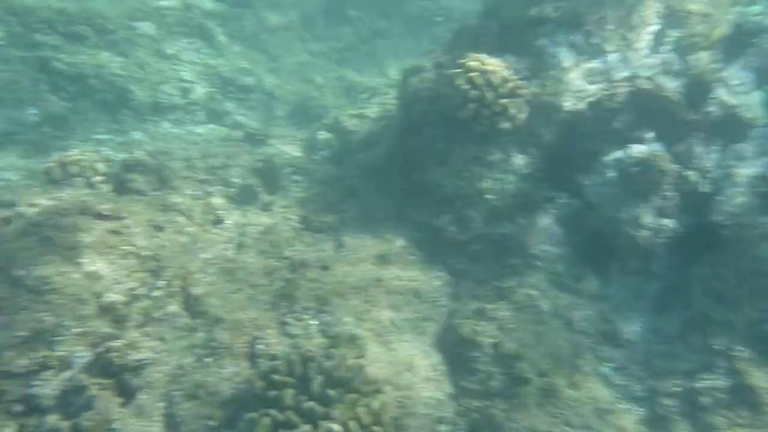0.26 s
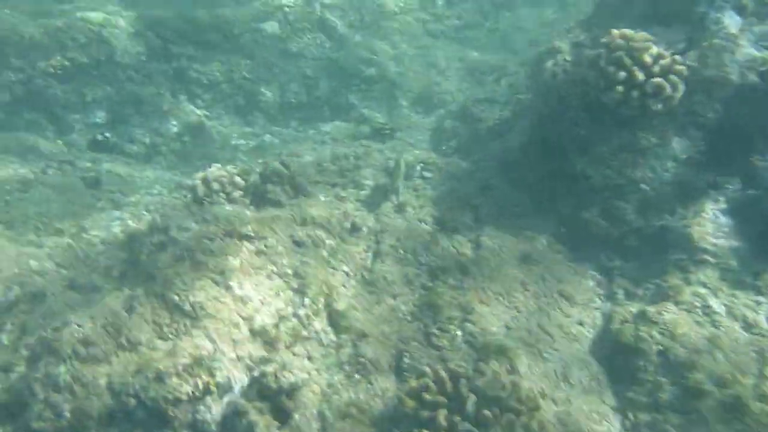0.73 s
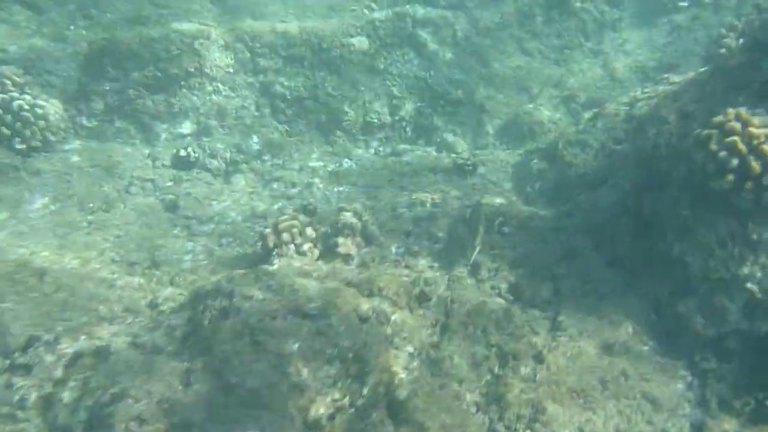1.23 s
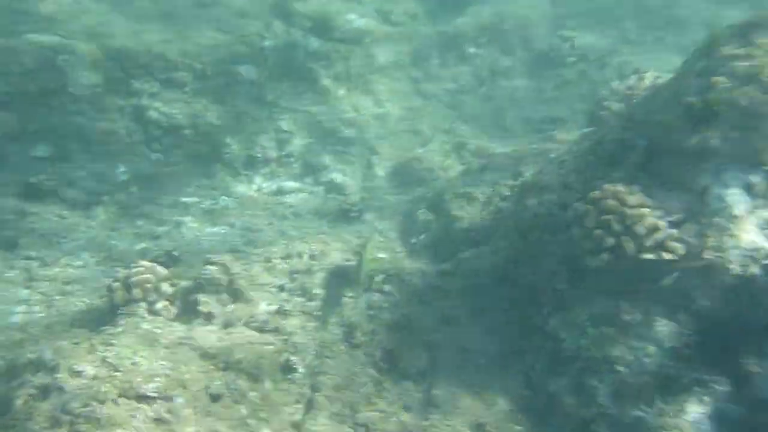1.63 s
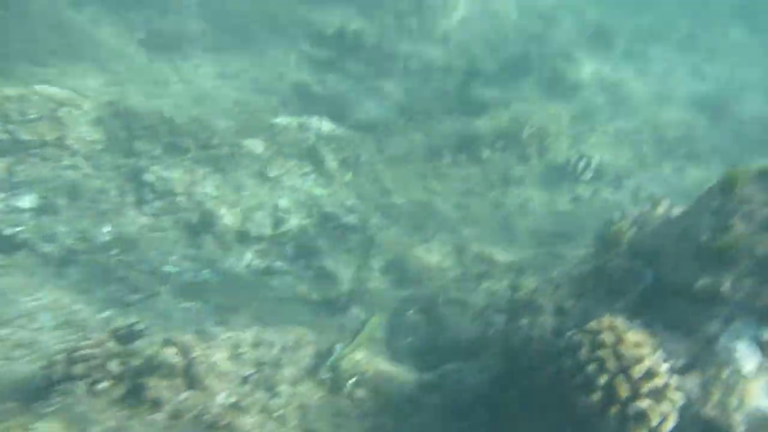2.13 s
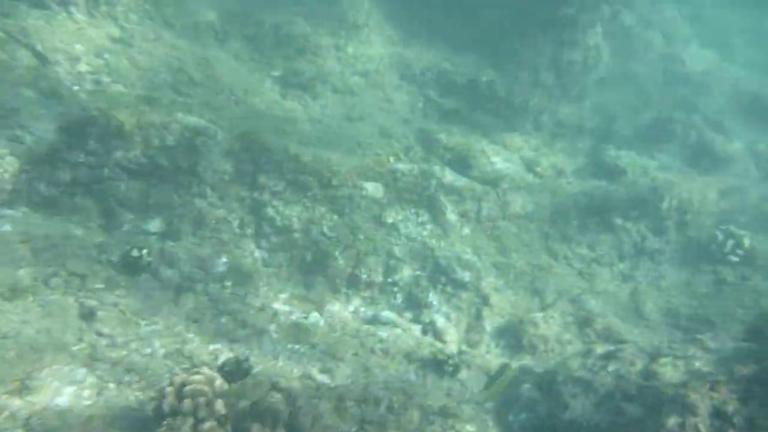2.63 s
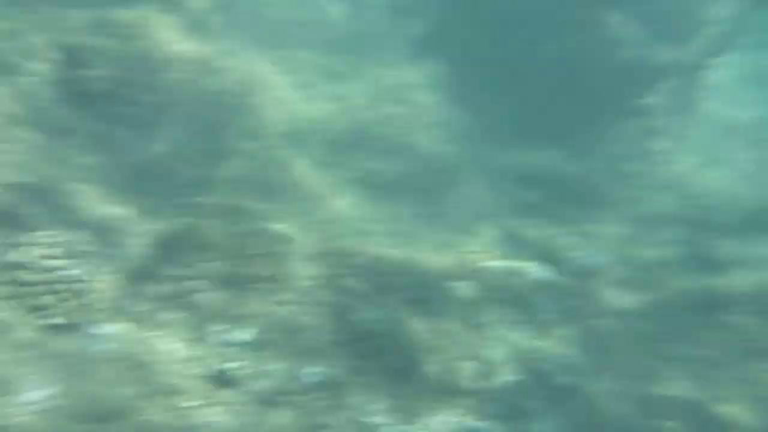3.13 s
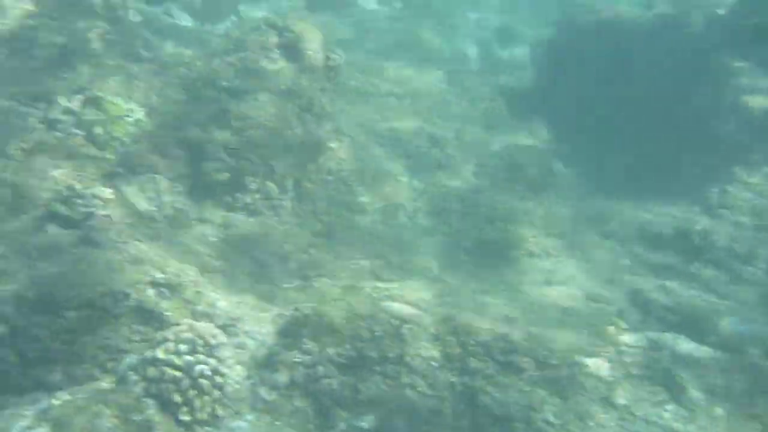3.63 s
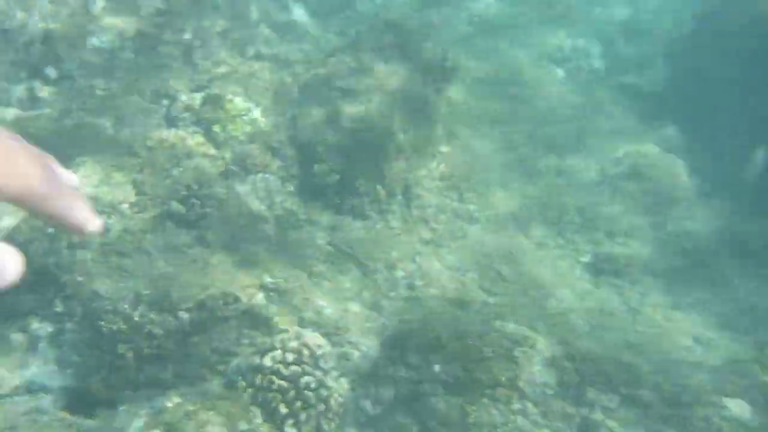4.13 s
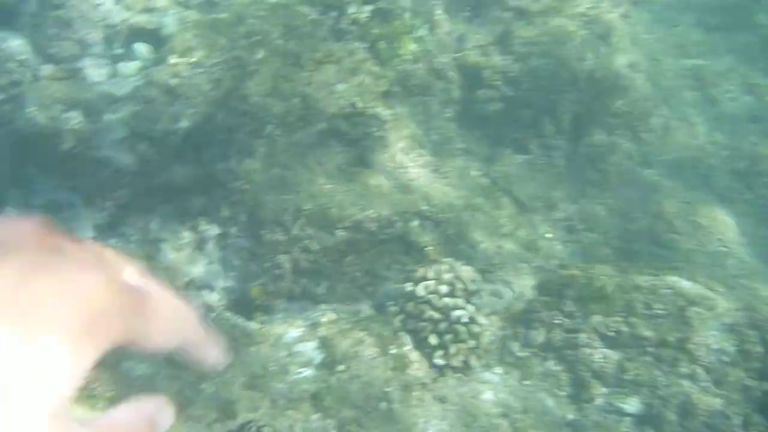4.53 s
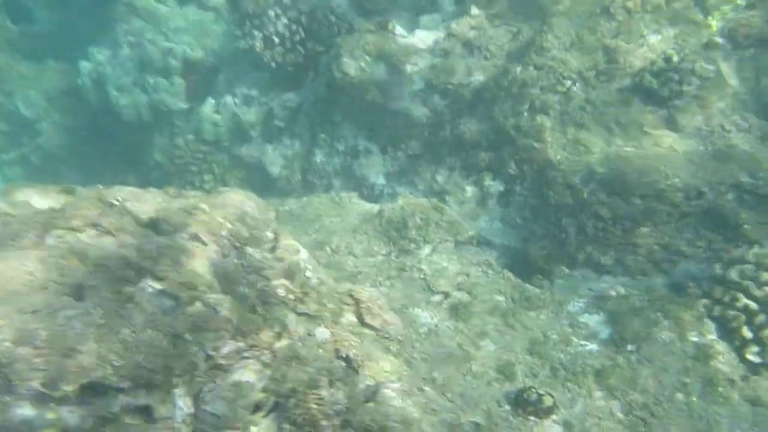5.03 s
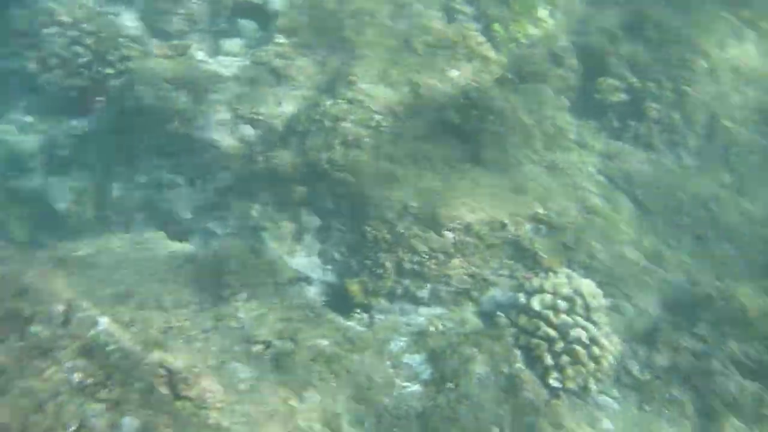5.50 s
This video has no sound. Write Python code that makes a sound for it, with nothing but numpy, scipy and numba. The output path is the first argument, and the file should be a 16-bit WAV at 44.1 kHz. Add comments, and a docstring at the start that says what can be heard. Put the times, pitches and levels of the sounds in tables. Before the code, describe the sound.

Hollow, muffled water murmur with constant tiny crackles and irregular hard snaps; later rough scuffs and a flurry of gliding bubble plinks.

```python
"""A muffled, ringing murmur and a bubble's plink come first, then sharp snaps over a shallow coral reef.
Snapping shrimp send single pulses that crack and ring a waterproof camera housing; random clicks through
resonances make the far reef, and many tiny cracks make the sizzle. Bubbles are gliding, dying tones, low
knocks are shorter or deeper ones, and scuffs are bursts of small slips. The recorder narrows the band,
turns down after loud snaps and rounds off their peaks."""
import sys
import numpy as np
from scipy import signal
from scipy.fft import rfft, irfft
from scipy.io import wavfile
from scipy.ndimage import uniform_filter1d, minimum_filter1d, map_coordinates
from numba import njit

SR = 44100
rng = np.random.default_rng(int(sys.argv[2]) if len(sys.argv) > 2 else 0)


def to_wav(sig):
    """Store sig (one row per channel, or 1-D mono) as 16-bit WAV at the path in sys.argv[1].

    Samples outside -1..1 are clipped; the rate is SR.
    """
    pcm = np.clip(np.atleast_2d(sig), -1, 1) * 32767
    pcm = np.round(pcm).astype(np.int16)
    wavfile.write(sys.argv[1], SR, pcm.T)  # frames by channels


N = 253995  # length in samples


def undb(db):
    """Decibels to gain."""
    return 10 ** (np.asarray(db) / 20)


def level(x):
    """Scale to an rms (average strength) of 1."""
    return x / np.sqrt(np.mean(x ** 2))


def unit_peak(x):
    """Scale so that the envelope peaks at 1."""
    return x / np.abs(signal.hilbert(x)).max()


def add(out, s, x):
    """Mix x into out from time s on, in seconds."""
    i = int(np.clip(s * SR, 0, N - 1))
    out[i:i + len(x)] += x[:N - i]


def at(curve, s):
    """Value of a (seconds, value) curve at the times s."""
    return np.interp(s, *np.transpose(curve))


def fade(t, t60):
    """Exponential decay, 60 dB down after t60 seconds."""
    return np.exp(-np.log(1000) * t / t60)


def lowpass(x, hz):
    """Fourth-order low-pass: keeps what lies below hz."""
    return signal.sosfilt(signal.butter(4, hz, fs=SR, output="sos"), x)


def highpass(x, hz):
    """Fourth-order high-pass: keeps what lies above hz."""
    return signal.sosfilt(signal.butter(4, hz, "high", fs=SR, output="sos"), x)


def resonate(x, hz, width_hz):
    """A resonance with steep skirts: two equal band-passes in a row, each of the given width."""
    b, a = signal.iirpeak(hz, hz / width_hz, fs=SR)
    once = signal.lfilter(b, a, x)
    return signal.lfilter(b, a, once)


def colour(x, points, size=1024):
    """Filter with the given (Hz, dB) curve that never sounds before its input."""
    hz, db = np.transpose(points)
    grid = np.maximum(np.fft.rfftfreq(size, 1 / SR), 1)
    curve_db = np.interp(np.log(grid), np.log(hz), db)
    # folding the cepstrum forward in time gives the minimum-phase response
    cepstrum = irfft(np.log(undb(curve_db)))
    cepstrum[1:size // 2] *= 2
    cepstrum[size // 2 + 1:] = 0
    response = irfft(np.exp(rfft(cepstrum)))
    return signal.fftconvolve(x, response)[:len(x)]


def walk(rate):
    """Slow chance: random levels held 1 / rate seconds and smoothed twice, spread 1."""
    k = int(SR / rate)
    steps = np.repeat(rng.standard_normal(N // k + 1), k)
    smooth = uniform_filter1d(uniform_filter1d(steps, k), k)
    return level(smooth[:N])


def wander(x, share, rate):
    """Let the pitch of a steady sound stray by a share, rate times a second."""
    read_position = np.cumsum(1 + share * walk(rate))
    return map_coordinates(x, [read_position], mode="mirror")


def clicks(rate, spread_db, limit_db):
    """Impulses at random moments, rate a second; most are far and weak, a few near and strong."""
    chance, size, sign = rng.random(N), rng.exponential(size=N), rng.choice([-1, 1], N)
    size_db = limit_db * np.tanh(spread_db * size / limit_db)
    return (chance < rate / SR) * sign * undb(size_db)


# How strongly each resonance of the housing sounds over time, before the gains below.
# Low rumble of water against the housing. Each row: time in seconds, level in dB.
LOW_LEVEL = [(0.0, -43.5), (0.46, -55.5), (0.7, -50.5), (0.89, -48.5), (1.2, -54), (1.6, -46),
             (2.13, -50.5), (3.3, -49), (4.32, -55), (4.43, -43), (4.6, -43.5), (4.95, -54.5), (5.12, -48),
             (5.35, -48), (5.52, -42.5), (5.65, -52.5), (5.75, -53)]
# Far reef in the hollow resonance. Each row: time in seconds, level in dB.
HOLLOW_LEVEL = [(0.0, -43.5), (0.26, -48.5), (0.72, -47.5), (1.25, -49.5), (1.47, -37), (1.68, -48),
                (2.8, -49), (2.98, -51.5), (3.28, -50), (3.75, -52), (4.32, -47.5), (4.44, -44.5),
                (4.58, -43), (5.04, -55), (5.24, -42.5), (5.46, -39.5), (5.64, -48), (5.75, -46.5)]
# Far reef in the main resonance. Each row: time in seconds, level in dB.
MAIN_LEVEL = [(0.0, -27.5), (0.46, -34.5), (0.74, -28.5), (0.95, -30.5), (1.14, -34.5), (1.49, -25),
              (1.75, -33), (2.15, -30.5), (2.67, -37), (2.99, -40.5), (3.22, -42.5), (3.41, -33),
              (3.86, -44.5), (4.18, -38.5), (4.32, -36), (4.36, -28.5), (4.43, -31.5), (4.66, -32),
              (4.79, -42), (5.41, -30.5), (5.75, -38.5)]
# Far reef in the upper resonance. Each row: time in seconds, level in dB.
UPPER_LEVEL = [(0.0, -38), (0.42, -48), (2.37, -39), (2.58, -36), (2.9, -34), (3.46, -39), (4.07, -31.5),
               (4.37, -50), (4.66, -44), (4.96, -39.5), (5.11, -47.5), (5.75, -55.5)]
LOW_DB, HOLLOW_DB, MAIN_DB, UPPER_DB = 1, 2, 0, -7.5  # gain of each resonance over its curve, in dB


def ringing(s):
    """Levels in dB of the low, hollow, main and upper resonances of the housing at the times s."""
    return (at(LOW_LEVEL, s) + LOW_DB, at(HOLLOW_LEVEL, s) + HOLLOW_DB,
            at(MAIN_LEVEL, s) + MAIN_DB, at(UPPER_LEVEL, s) + UPPER_DB)


# The four resonances, low to high, each made of a few peaks.
# Each row: pitch in Hz, width in Hz, strength in dB against the other peaks of its resonance.
LOW_PEAKS = [(145, 1300, -17), (265.3, 97, 0.5), (406, 69.5, 8), (602, 140, -7.5)]
HOLLOW_PEAKS = [(909, 145, 9), (1240, 360, -5.5)]
MAIN_PEAKS = [(1406, 130, 1), (1583, 260, 6), (1833, 90, 5.5)]
UPPER_PEAKS = [(2270, 150, 6), (2430, 1100, -10.5)]


def far_reef(drift=.018, swell_db=0.5):
    """Far snaps and water movement keep the resonances ringing; their pitch wanders and they swell unevenly."""
    low_db, hollow_db, main_db, upper_db = ringing(np.arange(N) / SR)
    crowd = clicks(rate=480, spread_db=4.5, limit_db=17) * undb(1.5 * walk(14))
    slosh = clicks(rate=600, spread_db=3.5, limit_db=15) * undb(2.5 * walk(16))

    def ring(drive, peaks):
        """Sum of the peaks, with every other one turned upside down."""
        x = 0
        for k, (hz, width_hz, db) in enumerate(peaks):
            x = x + (-1) ** k * undb(db) * resonate(drive, hz, width_hz)
        return level(wander(x, drift, 25))

    low = ring(slosh, LOW_PEAKS) * undb(low_db)
    hollow = ring(crowd, HOLLOW_PEAKS) * undb(hollow_db)
    main = ring(crowd, MAIN_PEAKS) * undb(main_db + swell_db * walk(30))
    upper = ring(crowd, UPPER_PEAKS) * undb(upper_db)
    return low + hollow + main + upper


# Colour of a crack heard through the housing, also used by the single snaps.
# Each row: pitch in Hz, strength in dB against the other pitches.
CRACK_COLOUR = [(100, -26), (700, -43), (1500, -12), (2600, 7), (3150, 0.5), (3900, 5.5), (4800, -0.5),
                (6200, -5.5), (7500, -22.5)]
# Resonances that colour the middle-distance cracks.
# Each row: pitch in Hz, width in Hz, strength in dB against the other resonances.
TICK_PEAKS = [(1640, 510, 2), (2600, 700, -3.5), (3520, 500, -.5), (4300, 1400, -1), (5800, 2400, -6)]


def sizzle(ticks_db=-57.0, faint_db=-61.5, hiss_db=-69):
    """Shrimp at middle distance: flurries of tiny cracks, each with its own colour, over a mass of faint ones."""
    flurries = undb(2.5 * np.tanh(walk(5)) + 3 * np.tanh(walk(22)))
    pulses = clicks(rate=340, spread_db=6.5, limit_db=24) * flurries
    ticks = 0
    for hz, width_hz, db in TICK_PEAKS:
        # each crack's own path strengthens or weakens this resonance
        path = undb(6.5 * np.tanh(rng.standard_normal(N)))
        ticks = ticks + undb(db) * level(resonate(pulses * path, hz, width_hz))
    t = np.arange(SR // 80) / SR
    scatter = .13 * rng.standard_normal(len(t)) * fade(t, t60=.0075)
    ticks = ticks + signal.fftconvolve(ticks, scatter)[:N]  # reflections off the coral follow each crack
    ticks = level(wander(ticks, .1, 60))
    faint = level(colour(clicks(rate=1500, spread_db=4, limit_db=15), CRACK_COLOUR))
    hiss = level(colour(rng.standard_normal(N), CRACK_COLOUR))
    return undb(ticks_db) * ticks + undb(faint_db) * faint + undb(hiss_db) * hiss


def plinks(table, rise_s, glide, splash_db, flutter_db=0):
    """Tones that swell, glide and die away, roughened by a splash; rows are seconds, dB, Hz, t60 in seconds."""
    out, t = np.zeros(N), np.arange(SR // 8) / SR
    each = np.ones(len(table))  # glide and splash may be one number or one per row
    rows = np.column_stack([table, glide * each, splash_db * each])
    flutter = undb(flutter_db * np.tanh(walk(650)))
    noises = rng.standard_normal((len(rows), len(t)))
    for (s, db, hz, t60, bend, noise_db), noise in zip(rows, noises):
        swell = 1 - np.exp(-(t / min(rise_s, t60 / 2)) ** 2)
        envelope = swell * fade(t, t60)
        envelope /= envelope.max()
        # the glide takes one t60 and passes the given pitch a fifth of the way through
        pitch_hz = hz * (1 + bend * (np.minimum(t / t60, 1) - .2))
        tone = np.sin(2 * np.pi * np.cumsum(pitch_hz) / SR)
        splash = level(resonate(noise, hz, hz / 2))
        add(out, s, undb(db) * envelope * (tone + undb(noise_db) * splash))
    return out * flutter


def fizz(fizz_db=0):
    """Tiny bubbles at random pitches, each as strong as the housing lets the reef ring at that pitch."""
    when, pitch, cycles, size, bend = rng.random((520, 5)).T
    s, hz = when * N / SR, 900 + 1600 * pitch
    _, *curves = ringing(s)
    centres_hz = [peaks[0][0] for peaks in (HOLLOW_PEAKS, MAIN_PEAKS, UPPER_PEAKS)]
    levels_db = np.transpose(curves)
    housing_db = np.array([np.interp(f, centres_hz, row) for f, row in zip(hz, levels_db)])
    nearness_db = np.minimum(-4.5 * np.log(1 - size), 10)
    t60 = (16 + 28 * cycles) / hz
    table = np.column_stack([s, housing_db + nearness_db + fizz_db, hz, t60])
    return plinks(table, rise_s=.001, glide=.25 * bend - .1, splash_db=-18)


# Burbles: how many a second, lowest and highest pitch in Hz, cycles until 60 dB down.
BURBLES_PER_S, BURBLE_HZ, BURBLE_CYCLES = 45, (960, 1340), 16
# Level of the weakest burble over the hollow curve, and how much stronger the strongest is, in dB.
BURBLE_DB, BURBLE_SPREAD_DB = -0.5, 16


def burble():
    """Bubble tones that drift up or down, stronger while the hollow resonance of the housing rings loud."""
    when, pitch, size, bend = rng.random((int(BURBLES_PER_S * N / SR), 4)).T
    s = when * N / SR
    hz = BURBLE_HZ[0] + (BURBLE_HZ[1] - BURBLE_HZ[0]) * pitch
    db = at(HOLLOW_LEVEL, s) + BURBLE_DB + BURBLE_SPREAD_DB * size ** 2
    table = np.column_stack([s, db, hz, BURBLE_CYCLES / hz])
    return plinks(table, rise_s=.002, glide=.15 * (2 * bend - 1), splash_db=-20)


# Rough scuffs, probably water and fingers on the housing.
# Each row: start in seconds, peak in dB, length in seconds (until the fade is 20 dB down).
SCUFFS = [(3.144, -25, 0.04), (3.32, -31, 0.032), (4.168, -22.5, 0.0086), (4.1887, -13.5, 0.044),
          (4.422, -20.5, 0.062), (4.692, -24, 0.015), (4.756, -26, 0.019), (4.772, -17, 0.068),
          (4.805, -11, 0.028), (4.941, -17.5, 0.012), (4.982, -34, 0.016), (5.075, -20.5, 0.046),
          (5.11, -20, 0.069), (5.48, -21, 0.025), (5.51, -22, 0.042)]
# Colour of a scuff. Each row: pitch in Hz, strength in dB against the other pitches.
SCUFF_COLOUR = [(60, -9.5), (150, -6.5), (400, 6), (680, -5), (900, 8.5), (1500, 16.5), (2300, 3.5),
                (3200, -12.5), (7000, -44.5)]


def scuffs():
    """Short runs of uneven slips that start fast and die away."""
    out = np.zeros(N)
    slips = colour(clicks(rate=1000, spread_db=3.5, limit_db=12), SCUFF_COLOUR)
    for s, db, length in SCUFFS:
        t = np.arange(int(2 * length * SR)) / SR
        envelope = (1 - np.exp(-t / 0.00017)) * fade(t, 3 * length)
        burst = slips[int(s * SR):][:len(t)] * envelope
        add(out, s, undb(db) * unit_peak(burst))
    return out


# Bubbles from each scuff: lowest and highest pitch in Hz, cycles until 60 dB down.
SPRAY_HZ, SPRAY_CYCLES = (1145, 2820), 36
# Their strongest level over the scuff, and the scatter of weakening below that, in dB.
SPRAY_DB, SPRAY_SPREAD_DB = -6.5, 16.5


def spray(count=9):
    """A cloud of short, rough bubbles breaks from each scuff and weakens as the scuff dies."""
    start, scuff_db, length = np.repeat(SCUFFS, count, axis=0).T
    when, pitch, size = rng.random((len(start), 3)).T
    hz = SPRAY_HZ[0] * (SPRAY_HZ[1] / SPRAY_HZ[0]) ** pitch
    db = scuff_db + SPRAY_DB - SPRAY_SPREAD_DB * (size + when + pitch) / 2  # late, high ones are weaker
    table = np.column_stack([start + when * length, db, hz, SPRAY_CYCLES / hz])
    return plinks(table, rise_s=.0006, glide=.1, splash_db=-12)


# Gulps: how many a second, lowest and highest pitch in Hz, cycles until 60 dB down.
GULPS_PER_S, GULP_HZ, GULP_CYCLES = 13, (195, 425), 4.9
# Level of the weakest gulp over the low rumble curve, and how much stronger the strongest is, in dB.
GULP_DB, GULP_SPREAD_DB = -5, 5


def gurgle():
    """Rows of small gulps at random moments, stronger while water rumbles against the housing."""
    when, pitch, size = rng.random((int(GULPS_PER_S * N / SR), 3)).T
    s = when * N / SR
    hz = GULP_HZ[0] + (GULP_HZ[1] - GULP_HZ[0]) * pitch
    db = at(LOW_LEVEL, s) + GULP_DB + GULP_SPREAD_DB * size ** 2
    return np.column_stack([s, db, hz, GULP_CYCLES / hz])


# Low knocks and gulps, perhaps fish or water slapping the housing.
# Each row: start in seconds, level in dB before filtering, pitch in Hz, seconds until 60 dB down.
KNOCKS = [(0.3571, -34, 414, 0.089), (0.7948, -28.5, 268, 0.063), (0.8425, -33.5, 306, 0.077),
          (0.89, -36.5, 337, 0.15), (0.9472, -32.5, 356, 0.13), (1.3745, -28.5, 375, 0.086),
          (1.832, -21, 523, 0.0048), (1.8362, -10, 480, 0.0059), (1.9008, -11, 510, 0.0065),
          (2.7645, -19, 402, 0.043), (2.982, -36, 419, 0.098), (3.1495, -35.5, 202, 0.034),
          (3.288, -26, 423, 0.08), (4.1875, -25.5, 410, 0.011), (4.2458, -30, 434, 0.013),
          (4.9382, -29.5, 440, 0.0089), (5.113, -34, 370, 0.0096), (5.154, -31, 448, 0.02),
          (5.203, -34, 426, 0.024), (5.243, -34.5, 435, 0.056), (5.3439, -24.5, 424, 0.08),
          (5.4775, -23.5, 345, 0.0055), (5.5049, -29.5, 244, 0.007), (5.542, -34.5, 362, 0.15),
          (5.651, -33.5, 384, 0.04), (5.665, -23, 372, 0.0037), (5.7024, -14, 500, 0.0037)]


def knocks(ring_hz=412, ring_width_hz=90, ring_db=-6):
    """Soft low pushes on the housing; a low resonance of it rings on briefly after each."""
    table = np.vstack([KNOCKS, gurgle()])
    pushes = lowpass(plinks(table, rise_s=0.0032, glide=0.15, splash_db=-14.5), 600)
    return pushes + undb(ring_db) * resonate(pushes, ring_hz, ring_width_hz)


# Single bubbles, large and small, loud and faint.
# Each row: start in seconds, level in dB before the flutter, pitch in Hz,
# seconds until 60 dB down, glide as a share of the pitch, splash in dB against the tone.
BUBBLES = [(0.0166, -18, 1612, 0.067, -0.029, -10), (0.4507, -13, 1576, 0.02, -0.093, -42),
           (0.832, -32, 1640, 0.0099, 0.0047, -8), (1.1766, -16.5, 1416, 0.045, .04, -19),
           (1.407, -16.5, 1690, 0.016, 0.022, -15), (1.878, -20.5, 1640, 0.054, 0.034, -18),
           (2.052, -18, 1650, 0.016, 0.14, -10), (2.0962, -14.5, 1865, 0.014, 0.13, -28),
           (2.104, -14.5, 1570, 0.03, 0.034, -19), (2.1416, -5, 1572, 0.016, -0.024, -32),
           (2.235, -27.5, 936, 0.068, 0.11, -25), (2.513, -22.5, 2540, .012, -0.1, -13.5),
           (2.885, -27, 1880, 0.045, .05, -20), (3.019, -23.5, 2290, 0.007, 0.059, -16),
           (3.177, -35, 2820, 0.019, -0.0006, -3), (3.326, -24, 1940, 0.018, 0.11, -7),
           (3.414, -27, 1595, 0.019, 0.021, -8), (3.445, -26, 2370, 0.014, 0.11, -16),
           (4.0888, -16.5, 2450, 0.015, -0.063, -16), (4.1913, -17.5, 870, 0.032, .05, -5.5),
           (4.202, -27, 2940, 0.021, 0.13, -11), (4.3525, -15.5, 1640, 0.0099, 0.14, -24),
           (4.6242, -19, 1586, 0.032, 0.08, -7), (4.6411, -12.5, 1780, 0.015, 0.14, -21),
           (4.6913, -8.5, 1670, 0.0063, .05, -24), (4.6944, -12.5, 1387, 0.045, -0.04, -19.5),
           (4.7632, -12.5, 2180, 0.02, 0.22, -28), (4.779, -14.5, 1910, 0.03, -0.21, -23),
           (4.7919, -7.5, 1823, 0.026, -0.08, -24.5), (4.8073, -12.5, 1310, 0.017, 0.018, -10),
           (4.808, -12.5, 1606, 0.081, -0.17, -21), (4.847, -23.5, 1507, 0.16, -0.076, -34),
           (4.909, -27, 2200, 0.012, .05, -23), (4.9405, -26, 924, 0.059, -0.09, -18),
           (4.9485, -15.5, 2170, 0.015, 0.11, -32), (4.9916, -16.5, 1890, 0.023, -0.18, -11),
           (5.017, -23, 1640, 0.025, -0.13, -23), (5.026, -31, 2640, 0.013, -0.12, -21),
           (5.044, -24, 1006, 0.12, -0.28, -21), (5.07, -23, 2040, 0.014, 0.052, -7),
           (5.095, -22, 1690, 0.013, .05, -12), (5.135, -18, 1407, 0.1, -0.26, -28),
           (5.2, -23, 952, 0.037, -0.015, -9.5), (5.224, -24.5, 1150, 0.037, 0.076, -19),
           (5.235, -27, 1407, 0.16, 0.21, -29), (5.4663, -18, 1393, 0.074, -0.21, -16),
           (5.533, -15, 1424, 0.021, -0.12, -23), (5.56, -26.5, 1090, 0.058, -0.24, -26.5),
           (5.589, -27.5, 1053, 0.12, -0.07, -24), (5.6135, -14.5, 1623, 0.091, -0.26, -32),
           (5.615, -20, 1050, 0.055, 0.047, -21)]


def single_bubbles(flutter_db=3):
    """Each bubble plinks as a gliding, dying tone with a splash, and its level flutters quickly."""
    *tones, glide, splash_db = np.transpose(BUBBLES)
    return plinks(np.transpose(tones), rise_s=0.0023, glide=glide, splash_db=splash_db, flutter_db=flutter_db)


# A snap rings higher the more the upper resonance outweighs the main one: pitch when equal, and slope.
RING_HZ, RING_HZ_PER_DB = 2243, 23


def ring_pitch(s):
    """Pitch in Hz at which a snap rings the housing at time s."""
    _, _, main_db, upper_db = ringing(s)
    return RING_HZ + RING_HZ_PER_DB * (upper_db - main_db)


def crack_colour(path_ripple_db=4):
    """The crack's spectrum, rippled differently by each snap's path through the coral."""
    hz, db = np.transpose(CRACK_COLOUR)
    return np.column_stack([hz, db + path_ripple_db * rng.uniform(-1, 1, len(hz))])


# Tones after a snap: lowest and highest pitch in Hz, cycles until 60 dB down, peak against the crack in dB.
AFTER_HZ, AFTER_CYCLES, AFTER_DB = (2230, 5120), 140, -8.5


def after_ring(t, count=3):
    """The coral around each snap rings on in a few short tones and leaves a ragged tail."""
    hz = AFTER_HZ[0] + (AFTER_HZ[1] - AFTER_HZ[0]) * rng.random((count, 1))
    tones = np.sin(2 * np.pi * hz * t) * fade(t, AFTER_CYCLES / hz)
    return unit_peak(np.sum(tones, axis=0))


def snaps(table, ring_width_hz=850, echo_s=0.00122, echo_db=-7, scatter_db=-15, body_db=-29):
    """A collapsing cavity sends one pulse: a crack, a short ring and low thump of the housing, and an echo."""
    out, t = np.zeros(N), np.arange(SR // 25) / SR
    pulse = signal.unit_impulse(len(t))
    echo = np.interp(t - echo_s, t, unit_peak(resonate(pulse, 1778, 680)), left=0)
    body = undb(body_db) * unit_peak(resonate(pulse, 350, 700))
    noises = rng.standard_normal((len(table), len(t)))
    for (s, ring_db, crack_db), noise in zip(table, noises):
        direct = unit_peak(resonate(pulse, ring_pitch(s), ring_width_hz))
        scatter = noise * fade(t, t60=rng.uniform(.006, .014))
        tail = undb(-12) * unit_peak(resonate(scatter, 1650, 700))
        ring = direct + undb(echo_db) * echo + tail
        ring = unit_peak(highpass(lowpass(ring, 2245), 950))
        crack = unit_peak(colour(pulse + undb(scatter_db) * scatter, crack_colour()))
        crack = crack + undb(AFTER_DB) * after_ring(t)
        add(out, s, undb(ring_db) * (ring + body) + undb(crack_db) * crack)
    return out


# Neighbouring shrimp: snaps a second, then ring and crack levels of the farthest,
# the gain of the nearest over it, and the shift either way by direction, all in dB.
NEIGHBOURS_PER_S = 14
NEIGHBOUR_RING_DB, NEIGHBOUR_CRACK_DB, NEAR_SPREAD_DB, FACING_SPREAD_DB = -28.5, -37.5, 6, 2


def neighbour_snaps():
    """Snaps at random moments, few of them near; direction shifts the balance of ring and crack."""
    when, near, facing = rng.random((int(NEIGHBOURS_PER_S * N / SR), 3)).T
    near_db = NEAR_SPREAD_DB * near ** 2
    facing_db = FACING_SPREAD_DB * (2 * facing - 1)
    ring_db = NEIGHBOUR_RING_DB + near_db - facing_db
    crack_db = NEIGHBOUR_CRACK_DB + near_db + facing_db
    return snaps(np.column_stack([when * N / SR, ring_db, crack_db]))


# Single shrimp snaps at set moments, strong and weak. Each row: start in seconds,
# level of the housing ring in dB, level of the sharp crack in dB, both before the recorder.
SINGLE_SNAPS = [(0.1186, -16, -17.5), (0.1645, -28, -29.5), (0.2458, -37, -33), (0.2577, -35, -31),
                (0.2698, -21.5, -24), (0.2842, -32, -27.5), (0.3392, -23, -31.5), (0.3768, -4.5, -20),
                (0.5584, -10.5, -20), (0.578, -21.5, -35), (0.6448, -25, -37), (0.6602, -14, -26),
                (0.8005, -20, -31.5), (0.8115, -31, -41), (0.8345, -31, -32), (0.8604, -2.5, -15.5),
                (0.8753, -17, -39), (0.8965, -19, -42), (0.9172, -8.5, -32.5), (0.9196, -19, -38),
                (1.076, -16.5, -29.5), (1.124, -30, -32), (1.1917, -8, -27.5), (1.2073, -22, -29.5),
                (1.2757, -23, -33), (1.299, -17, -31), (1.3481, -6.5, -26.5), (1.361, -34, -23),
                (1.4872, -24.5, -32), (1.5797, -34, -31), (1.6137, -26, -30.5), (1.6805, -11, -18.5),
                (1.8247, -37, -27.5), (1.9455, -19, -24), (1.9901, -23, -17), (2.0334, -23, -29),
                (2.0727, -30, -36), (2.1019, -21, -27), (2.1964, -25, -31), (2.232, -25, -27.5),
                (2.2725, -35, -47), (2.4251, -22, -34), (2.4313, -19, -32), (2.477, -18, -28),
                (2.5147, -11.5, -45), (2.5558, -19.5, -37), (2.5986, -15.5, -15.5), (2.7058, -26, -31),
                (2.7131, -22, -36), (2.8276, -18, -38), (2.8308, -4, -14.5), (3.0209, -25, -32),
                (3.176, -19.5, -25), (3.2405, -18.5, -17.5), (3.2613, -23, -20), (3.328, -32, -36),
                (3.4647, -15.5, -22), (3.4846, -40, -23), (3.4909, -20, -30), (3.5742, -7.5, -31),
                (3.5842, -17.5, -24), (3.7993, -38, -32), (3.8289, -25, -30.5), (3.8941, -28, -29),
                (3.9642, -38, -30), (3.9717, -42, -27), (4.016, -45, -20.5), (4.0595, -25, -23),
                (4.0894, -22, -24), (4.1024, -31, -26.5), (4.202, -26, -29.5), (4.2522, -14, -38),
                (4.2654, 6.5, -17), (4.3694, -13.5, -22), (4.4256, -20.5, -31), (4.5066, -39, -22),
                (4.5659, -33, -23.5), (4.6415, -11, -29.5), (4.696, -14.5, -27), (4.7215, -38, -30.5),
                (4.7617, -4, -27), (4.8818, 0.5, -17.5), (4.9855, -24, -29), (4.99, -14, -38),
                (4.9922, -7.5, -33.5), (5.1212, -29, -23.5), (5.1326, -14.5, -30), (5.307, -16, -45),
                (5.3365, -11.5, -59), (5.3624, -27, -34), (5.5313, -4, -16.5), (5.6681, -31, -29),
                (5.7133, -14, -27)]


def single_snaps():
    """Shrimp snaps at set moments, each pulse cracking and ringing the housing at its own strength."""
    return snaps(SINGLE_SNAPS)


def scene():
    """Everything reaches the one microphone through the housing."""
    bubbles = single_bubbles()
    shrimp = sizzle() + single_snaps() + neighbour_snaps()
    water = fizz() + burble() + scuffs() + spray() + bubbles + knocks()
    return (far_reef() + shrimp + water)[None]


@njit
def follow(x, attack, release):
    """Envelope that rises fast and falls slowly; attack and release are shares of the gap per sample."""
    out, e = np.empty(len(x)), 0.
    for i in range(len(x)):
        e += (abs(x[i]) - e) * (attack if abs(x[i]) > e else release)
        out[i] = e
    return out


def duck(x, attack_s=0.0007, release_s=0.0081, hold_s=0.083, threshold_db=-3.0):
    """Gain control: turns down within a few cycles of a loud snap, holds, then recovers."""
    envelope = lowpass(follow(x, 1 / (attack_s * SR), 1 / (release_s * SR)), 747)
    gain = 1 / np.maximum(envelope / undb(threshold_db), 1)
    half = int(hold_s * SR / 2)
    held = minimum_filter1d(gain, 2 * half + 1, origin=half)  # lowest gain of the last hold_s
    return x * held


PASS_HZ, TOP_HZ = (80, 7150), 15800  # band before the overload, and upper limit after it
CEILING, KNEE = .72, 30  # overload: the highest amplitude, and how sharply it is reached


def record(dry):
    """The recorder narrows the band, notches it, turns down after loud snaps and rounds off their first cycles."""
    x = signal.sosfilt(signal.ellip(6, .3, 75, PASS_HZ[1], fs=SR, output="sos"), dry[0])
    x = signal.sosfilt(signal.butter(2, PASS_HZ[0], "high", fs=SR, output="sos"), x)
    x = signal.lfilter(*signal.iirnotch(5400, 11, fs=SR), x)
    x = duck(x)
    x = x / (1 + np.abs(x / CEILING) ** KNEE) ** (1 / KNEE)  # overload adds sound above the pass band
    return signal.sosfilt(signal.ellip(8, .2, 70, TOP_HZ, fs=SR, output="sos"), x)[None]


dry = scene()
out = record(dry)
to_wav(out)
```